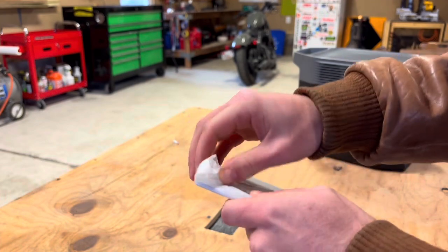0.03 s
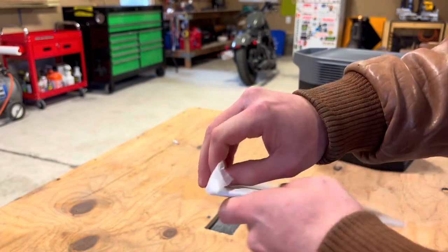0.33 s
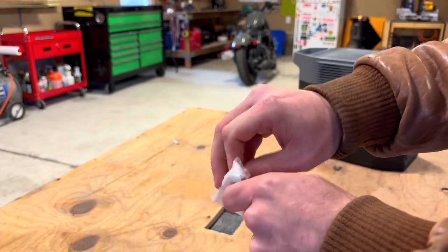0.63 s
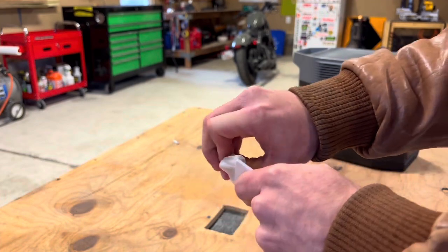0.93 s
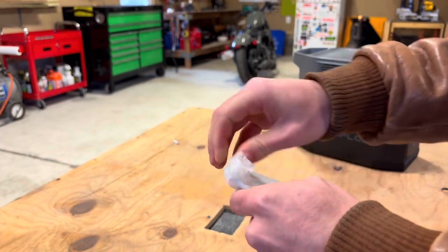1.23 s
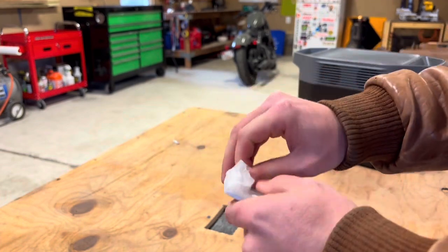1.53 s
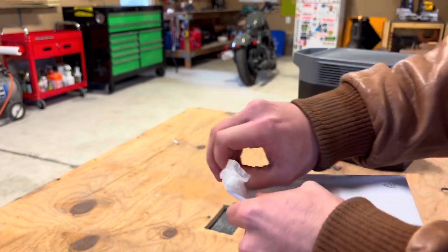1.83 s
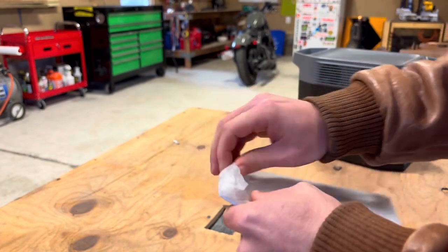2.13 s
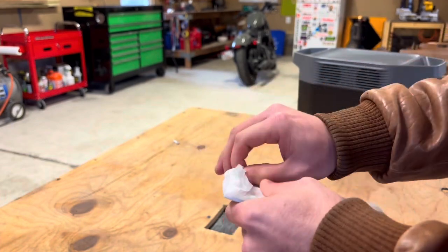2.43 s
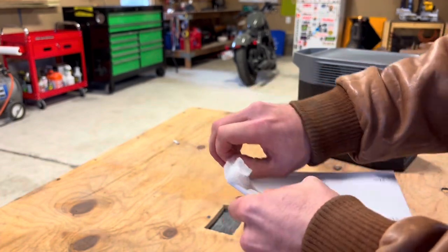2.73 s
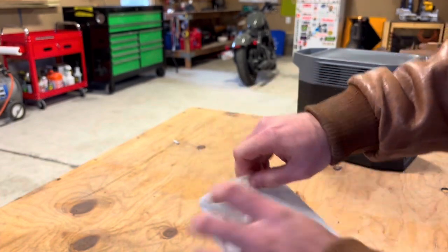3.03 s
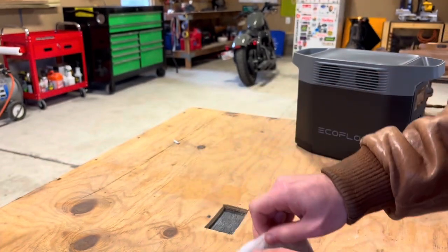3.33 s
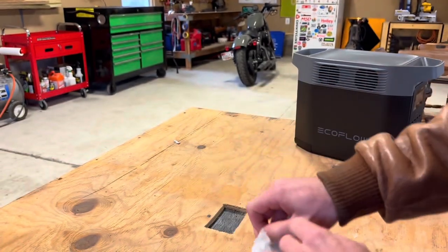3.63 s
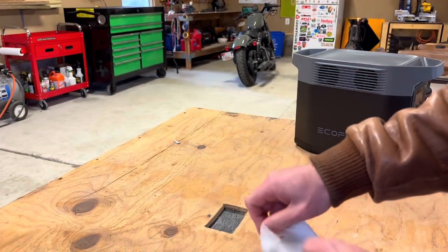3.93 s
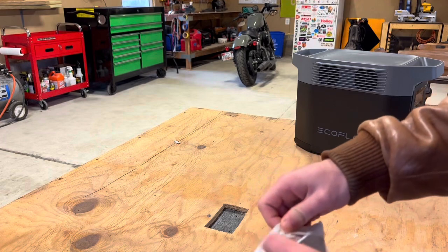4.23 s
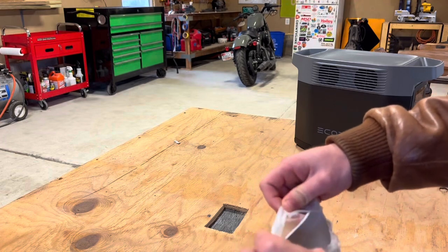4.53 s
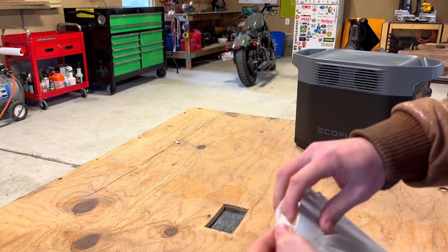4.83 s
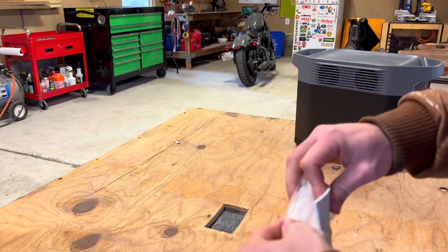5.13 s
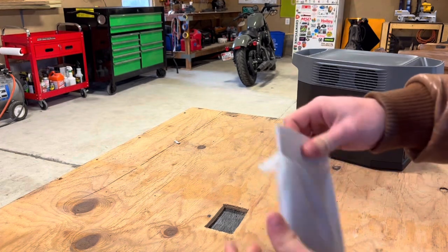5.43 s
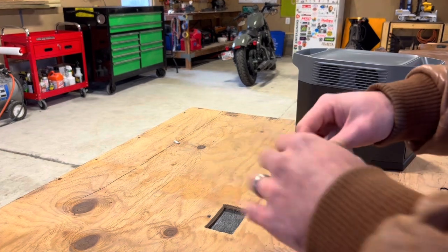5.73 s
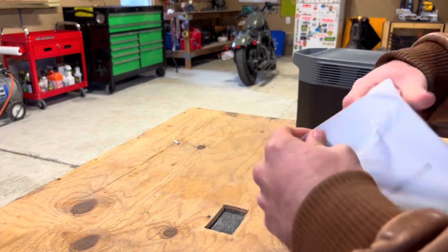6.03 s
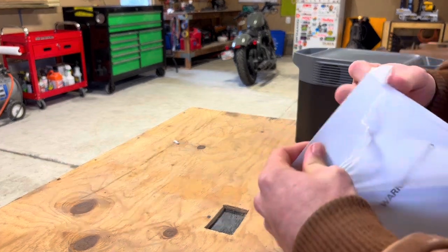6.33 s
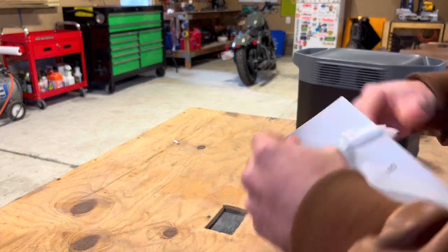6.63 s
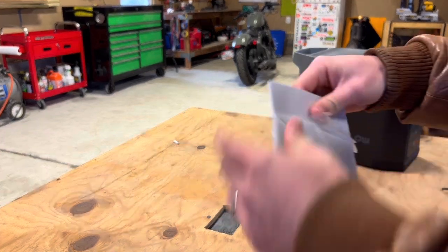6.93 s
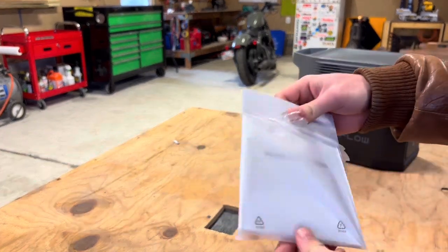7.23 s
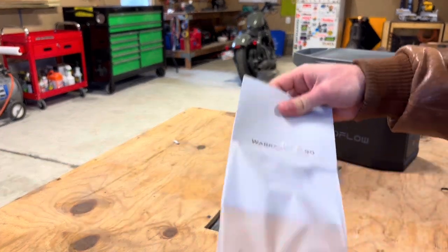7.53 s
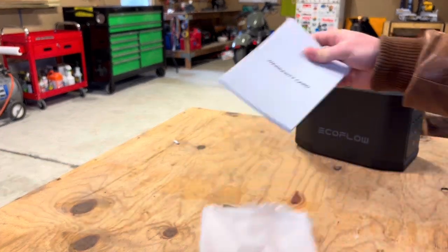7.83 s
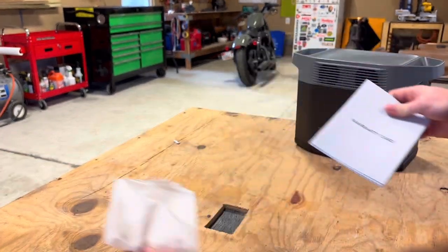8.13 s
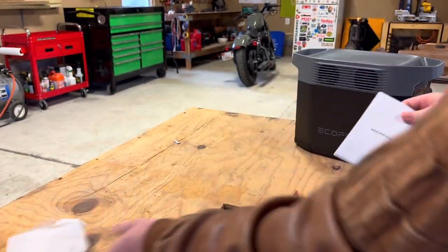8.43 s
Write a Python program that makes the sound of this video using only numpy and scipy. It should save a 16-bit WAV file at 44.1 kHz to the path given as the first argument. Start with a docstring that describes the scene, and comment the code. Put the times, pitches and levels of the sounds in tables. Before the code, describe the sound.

Hands work open a thin plastic sleeve close to the microphone. The film rubs and crackles in uneven bursts, with sharp snapping creases, brief finger rasps and small hollow pops, the loudest near the middle. Near the end another pop leads into a smooth hiss as a booklet slides out, and the crinkles thin away. A faint low rumble and a short, soft echo suggest a workshop.

```python
"""Two hands open a thin plastic sleeve over a plywood workshop bench and slide a booklet out.
From the start, over low room rumble, film rubs and crackles; creases snap and echo off the bench.
At 0.8 s a finger rasps on taut film and the pouch first pops; the loudest pop comes at 3.75 s.
At 5.3 s a low rub falls as the sleeve is turned; at 7.5 s a pop leads into a smooth sliding hiss,
then the snaps thin out. A close microphone pair hears it all."""
import sys
import numpy as np
from scipy import signal
from scipy.fft import rfft, irfft, next_fast_len
from scipy.io import wavfile
from scipy.ndimage import uniform_filter1d

SR = 44100
rng = np.random.default_rng(int(sys.argv[2]) if len(sys.argv) > 2 else 0)


def persist_wave(psi):
    """Save psi, clipped to +-1, as 16-bit WAV."""
    counts = np.round(np.clip(psi, -1, 1) * 32767).astype(np.int16)
    wavfile.write(sys.argv[1], SR, np.atleast_2d(counts).T)


N = 383229
TIME = np.arange(N) / SR
TOP_HZ = 15800


def undb(db):
    """Decibels to gain."""
    return 10 ** (np.asarray(db) / 20)


def unit(x):
    """Scale to rms 1."""
    return x / np.sqrt(np.mean(x ** 2))


def curves(table):
    """Columns of a (t/s, ...) table, interpolated per sample."""
    times, *columns = np.transpose(table)
    return [np.interp(TIME, times, column) for column in columns]


def colour(x, points):
    """Filter by a curve through (f/Hz, gain/dB) points."""
    hz, db = np.transpose(points)
    freq = np.maximum(np.fft.rfftfreq(x.shape[-1], 1 / SR), 1)
    return irfft(rfft(x) * undb(np.interp(np.log(freq), np.log(hz), db)), x.shape[-1])


def minimum_phase(db):
    """Quickest impulse response with this spectrum."""
    cepstrum = irfft(np.log(undb(db)))
    half = len(cepstrum) // 2
    cepstrum[1:half] *= 2
    cepstrum[half + 1:] = 0
    return irfft(np.exp(rfft(cepstrum)))


def spread(pair, side_db):
    """Mid and weaker side to left and right, power kept."""
    side = undb(side_db)
    return np.array([pair[0] + side * pair[1], pair[0] - side * pair[1]]) / np.sqrt(1 + side ** 2)


def add(out, start_s, sound):
    """Mix a stereo sound in at start_s."""
    i = max(int(start_s * SR), 0)
    out[:, i:i + sound.shape[1]] += sound[:, :max(N - i, 0)]


def rumble():
    """Low noise of the building; its level wanders and dips."""
    # rumble envelope: t/s, level/dB
    envelope = [(0, -60.5), (.7, -65.5), (.92, -54.5), (1.19, -65), (1.4, -60.5), (2.0, -60), (2.1, -76),
                (2.35, -61.5), (2.52, -82), (2.68, -60.5), (3.48, -80.5), (3.77, -55), (3.92, -64),
                (4.85, -58.5), (5.42, -74), (5.5, -57), (7.2, -59), (8.69, -57)]
    # rumble spectrum: f/Hz, gain/dB
    spectrum = [(20, -32), (35, -11.5), (57, 4.5), (80, 0.5), (120, -6), (180, -12.5), (300, -60.5),
                (700, -67.5)]
    level_db, = curves(envelope)
    noise = spread(rng.standard_normal((2, N)), side_db=-18)
    return unit(colour(noise, spectrum)) * undb(level_db)


def hands(attack_s=.0055, held_trim_db=-1, held_hiss_db=-3.5, held_share=.2):
    """Finger strokes add power to the rustle of holding: crinkle dB, three relative dB, crackle share."""
    # holding the sleeve: t/s, crinkle/dB, soft handling/dB rel, sheet flexing/dB rel
    holding = [(0, -64.5, -12, -16), (.6, -64.5, -6, 1), (1.0, -64, 1.5, 8), (1.4, -64, -2.5, -1),
               (2.05, -61.5, -7.5, 1.5), (2.45, -67.5, -4, 2), (2.8, -62, -40, 3), (3.4, -59, -15, -15),
               (3.9, -64.5, -4, 13), (4.4, -67, -2, 0.5), (4.9, -60.5, -0.5, -4.5), (5.5, -62, 0.5, 1.5),
               (5.72, -68.5, 1, 0), (6.25, -57.5, -6, -3.5), (6.78, -70.5, 0, 2.5), (7.4, -70, 2.5, -5),
               (8.2, -65.5, 6, 4), (8.69, -68, 5, 2)]
    # finger strokes: t/s, length/s, crinkle/dB, soft handling/dB rel, sheet flexing/dB rel,
    # fine hiss/dB rel, crackle share/0-1
    strokes = [(.01, .035, -53.5, -9.5, -4, -1.5, .2), (0.112, 0.025, -59, -3, -4, 1, .4),
               (0.167, .1, -54.5, -8, -7, 2, .6), (0.357, .06, -59, -15, -23, 4.5, .3),
               (0.478, .05, -54, -4.5, -13, 2.5, .1), (0.701, 0.017, -51.5, -18, -10, -4, .5),
               (0.793, 0.024, -40, -24, -15, 0, .2), (0.827, .02, -37, -10, -13, -8, .25),
               (0.867, 0.04, -60.5, 10.5, -6, -15, .3), (1.076, .025, -54.5, -3.5, -12, 0, 0.6),
               (1.282, 0.011, -51, -0.5, 0, -4, .1), (1.442, 0.022, -60.5, -14, 3.5, 2, .3),
               (1.518, 0.018, -52.5, -10.5, -22, -3, .7), (1.619, .018, -53.5, -11, 0, -8, .4),
               (1.755, .033, -49.5, -11, 8, -3, .6), (1.807, .09, -55, -19, -6, 0.5, .7),
               (2.038, .04, -57, -23, -6, -4, .5), (2.161, 0.014, -53, 2.5, -9, -10, 0.2),
               (2.237, .012, -53.5, -7, -6, -6, .3), (2.312, .03, -57, -9, -3, 3, 0.8),
               (2.543, .045, -53, -20, 5, -3, 0.6), (2.664, .03, -48, -16, 0, -3, .3),
               (2.716, 0.066, -56, -29, -13, 2, 0.6), (2.894, 0.044, -51, -9, -2, -2, .5),
               (2.941, 0.037, -40.5, -13.5, -7, -2, .2), (2.985, 0.032, -42.5, -14, -1.5, -7, .25),
               (3.019, .012, -52.5, 6.5, -8, -17, .5), (3.142, 0.044, -52, -16, -7.5, -1.5, .3),
               (3.221, 0.079, -55, -20, -4.5, -2, 0.5), (3.423, 0.037, -47.5, -26, -18, -5, .5),
               (3.504, 0.077, -53, -39, 2, -2, .4), (3.587, 0.055, -45.5, -25, 2.5, -5, .6),
               (3.664, .05, -44, -11, 6.5, -5, .3), (3.756, .036, -46.5, -1, -5, 4.5, .4),
               (3.809, .08, -53.5, 3.5, -3, -10, 0.4), (3.927, .07, -58.5, 2.5, 5, -7, 0.4),
               (4.018, .06, -49.5, -6, 5.5, -5, .6), (4.101, .07, -52, -5, -0.5, -1, 0.6),
               (4.211, 0.09, -49, -1, -3.5, 1.5, .35), (4.405, .012, -59, -6, -12, -12, 0.2),
               (4.463, 0.022, -52.5, -13, -6, -2, 0.5), (4.523, 0.026, -58.5, 2, 5.5, 1, .6),
               (4.605, 0.039, -57, -6, 1, 5.5, 0.4), (4.757, 0.041, -52.5, -3.5, -3.5, 0, .4),
               (4.812, .03, -44, -7, -3.5, -6, .4), (4.98, 0.018, -48.5, -4.5, -13, -1.5, .3),
               (5.072, .07, -46.5, -10, -9, 4.5, .45), (5.165, .05, -51, -27, -6, -7, .3),
               (5.317, 0.041, -47, -3, -0.5, -2, .4), (5.377, 0.024, -42, -8, -4, -4, .15),
               (5.438, .06, -57.5, -5, -15, -5, 0.01), (5.516, 0.032, -50.5, -7, -16, -13, .3),
               (5.567, .05, -63.5, 1.5, -18, -15, .2), (5.768, 0.02, -48, -2.5, -2, -6, 0.5),
               (5.82, 0.057, -57, -9, -9, 0, 0.5), (5.881, .065, -47.5, -11, -5, -1, .4),
               (5.956, .055, -44, -8.5, -1.5, -1.5, .55), (6.038, .12, -52, -16, -4, -6, .5),
               (6.17, 0.013, -48.5, 0.5, 0, 3, .45), (6.353, 0.023, -47, -10, -9, 2.5, .2),
               (6.387, 0.017, -43, -17, -13, 0, 0), (6.512, .02, -49, -14, -5, 4, 0.1),
               (6.541, .018, -44.5, -12, -0.5, 3, .3), (6.637, .016, -49, -15, -6, -4, .3),
               (6.828, .035, -53, -3, -5.5, -3, .3), (6.879, .025, -58, -10, -3, -7, .4),
               (6.98, .022, -50.5, -4, -1, -1, .3), (7.052, .013, -53, -2, -7, -10, 0.4),
               (7.13, .016, -51, -12, -7, 0.5, .1), (7.223, .014, -57, -3, -0.5, -8, .5),
               (7.305, 0.027, -53.5, -18, -2.5, -1, .2), (7.463, 0.017, -45.5, -20, -7, -8, 0),
               (7.486, .036, -37.5, -7.5, -12, 3, 0.01), (7.533, 0.048, -43, -30, -18, 5.5, 0.02),
               (7.581, .148, -45, -20, -14.5, 2.5, 0), (7.753, 0.027, -54.5, 3.5, -1, -3, .4),
               (7.887, 0.03, -62.5, 9, -2, -5, .2), (8.081, 0.031, -61.5, -10, 3, 0, .4),
               (8.414, .02, -57.5, 6, -1, -4, .2), (8.497, 0.05, -56.5, 3, -2.5, -6, .15)]
    release_s = np.array([[.014], [.016], [.016], [.023]])  # crinkle, handling, sheet, hiss
    held, handling, sheet = curves(holding)
    held = held + held_trim_db
    power = undb([held, held + handling, held + sheet, held + held_hiss_db]) ** 2
    crackle = held_share * power[0]
    for start_s, length_s, db, handling, sheet, hiss, share in strokes:
        near = slice(max(int(start_s * SR) - SR // 10, 0), int((start_s + length_s) * SR) + SR // 4)
        early_s = np.maximum(start_s - TIME[near], 0)
        late_s = np.maximum(TIME[near] - start_s - length_s, 0)
        envelope = np.exp(-early_s / attack_s - late_s / release_s)
        stroke = (undb([[db], [db + handling], [db + sheet], [db + hiss]]) * envelope) ** 2
        power[:, near] += stroke
        crackle[near] += share * stroke[0]
    crinkle, handling, sheet, hiss = 10 * np.log10(power)
    share = np.clip(crackle / power[0], 0, 1) ** .76  # brittle film crackles even in smooth strokes
    return crinkle, handling - crinkle, sheet - crinkle, hiss - crinkle, share


def film_rustle(gain_db=-1, grains_per_s=280, size_db=6, tint_db=4.5, rise_s=.00051, decay_s=.00056):
    """Tiny creases crackle, each with its own tint, over the hiss of film sliding on film and paper."""
    crinkle, handling, sheet, hiss, share = hands()
    share = np.clip(share, 0, .95)
    count = int(grains_per_s * N / SR)
    onsets = rng.integers(0, N, count)
    sizes = undb(size_db * np.minimum(rng.exponential(size=count), 3.5))
    t = np.arange(-128, 129) / SR
    grain = np.exp(np.minimum(t / rise_s, -t / decay_s))
    # sliding catches and slips, least in a smooth stroke
    flicker = unit(uniform_filter1d(rng.standard_normal(N), size=260))
    slip = unit(undb((1.06 + .5 * share) * flicker))
    # bands from broad bends to the finest wrinkles
    edges_hz = [170, 400, 750, 1050, 1600, 2300, 3200, 4400, 6000, 8000, 10500, 13000, 15200]
    bands_db = [handling - 4, handling - 4.8, sheet - 6.8, sheet - 4.5, .52 * sheet - 6.8,
                .31 * sheet - 6, .092 * sheet - 5, -5.5, -5.2, hiss - 3.5, hiss - 5, hiss - 7]
    out = np.zeros((2, N))
    for low_hz, high_hz, band_db in zip(edges_hz, edges_hz[1:], bands_db):
        energy = np.zeros(N)
        energy[onsets] = (sizes * undb(tint_db * rng.standard_normal(count))) ** 2
        energy = np.maximum(signal.oaconvolve(energy, grain ** 2, "same"), 0)
        energy /= np.maximum(uniform_filter1d(energy, size=1800), 1e-6)  # the hands set the level
        brittle = share * min(low_hz / 700, 1)  # broad bends crackle less
        drive = rng.standard_normal((2, N)) * np.sqrt(brittle * energy + (1 - brittle) * slip ** 2)
        bandpass = signal.butter(3, [low_hz, high_hz], "bandpass", fs=SR, output="sos")
        band = spread(signal.sosfilt(bandpass, drive), side_db=-10)
        out += unit(band) * undb(crinkle + band_db + gain_db)
    return out


def buckle(t, lead_s, flutter_s, crack=.52, bench_s=.0015, bench_db=-9.5):
    """A crease yields, cracks, flutters out and echoes off the bench top."""
    since_s, yield_s = t - lead_s, .36 * flutter_s
    envelope = np.exp(np.minimum(since_s / yield_s, -since_s / flutter_s))
    push = rng.standard_normal((2, len(t))) * envelope
    push /= np.sqrt(np.sum(push ** 2, axis=1, keepdims=True))
    push[0, int(lead_s * SR)] += crack * rng.choice([-1, 1])
    spectrum = rfft(push)
    # whitened: the facet supplies the colour
    spectrum /= np.sqrt(uniform_filter1d(np.abs(spectrum) ** 2, size=71, axis=1))
    lag_s = bench_s * np.exp(.199 * rng.standard_normal())
    freq = np.fft.rfftfreq(len(t), 1 / SR)
    echo = undb(bench_db) * np.exp(-2j * np.pi * freq * lag_s)
    return irfft(spectrum * (1 + echo))


def snaps(creases, peak_db=5.5, peak_octaves=.29, low_hz=260, lead_s=.003, size=1024):
    """Each buckling crease rings a facet of film too small to radiate much bass."""
    out, t = np.zeros((2, N)), np.arange(size) / SR
    freq = np.maximum(np.fft.rfftfreq(size, 1 / SR), 20)
    band_loss_db = 10 * np.log10(1 + (low_hz / freq) ** 4) + 20 * np.log10(1 + (freq / TOP_HZ) ** 20)
    dispersion = np.exp(-2j * np.pi * .696 * np.log(freq))  # slow bending waves: lows arrive late
    for start_s, db, hz, fall_db_oct in creases:
        # large, low facets lose bass more steeply and flutter longer
        facet_size = 1070 / hz
        rise_db_oct = 6.5 * facet_size ** .32
        flutter_s = .00223 * facet_size ** .35
        octave = np.log2(freq / hz)
        slopes_db = rise_db_oct * np.minimum(octave, 0) - fall_db_oct * np.maximum(octave, 0)
        shape_db = slopes_db + peak_db / (1 + (octave / peak_octaves) ** 2) - band_loss_db
        facet = irfft(rfft(minimum_phase(shape_db)) * dispersion)
        push = spread(buckle(t, lead_s, flutter_s), side_db=-11)
        ring = signal.fftconvolve(push[:, :size * 3 // 4], facet[None], axes=1)
        power_5ms = np.sum(ring ** 2) / 2 / (.005 * SR)
        add(out, start_s - lead_s, ring * undb(db) / np.sqrt(power_5ms))
    return out


def small_creases(count=32, above_db=3, scatter_db=4, max_db=-50, low_hz=1100, high_hz=11000):
    """Rows for snaps(): lesser creases give at random, more often and louder under harder crumpling."""
    crinkle, *_, share = hands()
    chance = np.cumsum(share * undb(crinkle))
    when, size, facet = rng.random((count, 3)).T
    onsets = np.searchsorted(chance, when * chance[-1])
    levels_db = np.minimum(crinkle[onsets] + above_db - scatter_db * np.log(1 - size), max_db)
    facets_hz = low_hz * (high_hz / low_hz) ** facet
    falls_db_oct = [5] * count
    return list(zip(TIME[onsets], levels_db, facets_hz, falls_db_oct))


def finger_drags(slip_hz=620, scatter=.51, size_db=3, bandwidth=.14, edge_s=.004):
    """A fingertip sticks and slips unevenly, ringing taut film with a papery rasp."""
    # drags on taut film: t/s, length/s, resonance/Hz, level/dB
    drags = [(.808, 0.015, 2450, -45), (5.383, 0.043, 3380, -43.5), (5.76, 0.029, 3180, -49)]
    out, t = np.zeros((2, N)), np.arange(SR // 10) / SR
    for start_s, length_s, hz, db in drags:
        gaps, sizes = rng.standard_normal((2, len(t) // 20))
        onsets = (np.cumsum(np.exp(scatter * gaps)) / slip_hz * SR).astype(int)
        slips = np.bincount(onsets, undb(size_db * sizes), len(t))[:len(t)]
        ring = unit(signal.lfilter(*signal.iirpeak(hz, 1 / bandwidth, fs=SR), slips))
        envelope = np.minimum(t / edge_s, 1) * np.exp(-np.maximum(t - length_s, 0) / edge_s)
        add(out, start_s, spread([ring, ring[::-1]], side_db=-11) * undb(db) * envelope)
    return out


def pouch_pops(attack_s=.0022, roughness=.21):
    """The air and walls of the pouch ring briefly and unevenly."""
    # pouch resonances: t/s, f/Hz, level/dB, t60/s
    modes = [(0.847, 320, -29, 0.02), (0.848, 710, -20, 0.01), (0.852, 160, -35.5, 0.048),
             (2.168, 248, -47, 0.12), (2.668, 181, -35.5, 0.087), (2.669, 239, -42, 0.067),
             (2.666, 620, -19.5, 0.022), (3.411, 870, -39, 0.055), (3.41, 1450, -43.5, 0.16),
             (3.505, 1010, -23.5, 0.026), (3.505, 2530, -19.5, 0.019), (3.7515, 1030, -1, 0.015),
             (3.7514, 1294, -3.5, 0.014), (3.751, 1520, -12.5, 0.023), (3.753, 293, -17, 0.017),
             (3.756, 191, -30, 0.032), (3.755, 442, -13.5, 0.024), (3.755, 550, -31, 0.014),
             (3.756, 95, -37.5, 0.14), (4.835, 406, -24, 0.014), (5.138, 414, -34, 0.032),
             (5.286, 347, -32.5, 0.024), (5.352, 287, -32, 0.028), (5.456, 290, -41.5, 0.062),
             (5.778, 340, -32, 0.024), (7.489, 960, -12, 0.0061), (7.761, 395, -43, 0.03)]
    out, t = np.zeros((2, N)), np.arange(SR // 4) / SR
    for start_s, hz, db, t60_s in modes:
        wobble = unit(uniform_filter1d(rng.standard_normal((2, len(t))), size=90, axis=1))
        ring = np.sin(2 * np.pi * hz * t) + roughness * wobble * np.cos(2 * np.pi * hz * t)
        envelope = (1 - np.exp(-t / attack_s)) * np.exp(-np.log(1000) * t / t60_s)
        add(out, start_s, undb(db) * ring * envelope)
    return out


def turning_rub(start_s=5.33, end_s=5.72, from_hz=310, to_hz=105, fall_s=.05, level_db=-57):
    """A soft, low rub falls in pitch as the sleeve is turned."""
    since_s = np.maximum(TIME - start_s, 0)
    hz = to_hz + (from_hz - to_hz) * np.exp(-since_s / fall_s)
    phase = 2 * np.pi * np.cumsum(hz) / SR
    lowpass = signal.butter(2, 20, fs=SR, output="sos")
    rub = unit(signal.sosfilt(lowpass, rng.standard_normal((2, N))))
    progress = np.minimum(since_s / (end_s - start_s), 1)
    swell = np.sqrt(np.maximum(np.sin(np.pi * progress), 0))
    return undb(level_db) * swell * (rub[0] * np.sin(phase) + rub[1] * np.cos(phase))


def workshop(x, wet_db=-19.5, t60_s=.56, build_s=.00099):
    """Cluttered walls return a soft, diffuse tail."""
    # room tail spectrum: f/Hz, gain/dB
    spectrum = [(100, 4.5), (500, 9), (1200, 10), (3000, 8.5), (7000, 4.5), (15000, -2)]
    t = np.arange(SR * 3 // 4) / SR
    envelope = np.exp(-np.log(1000) * t / t60_s) * (1 - np.exp(-t / build_s))
    tail = spread(rng.standard_normal((2, len(t))) * envelope, side_db=-3.5)
    tail = unit(colour(tail, spectrum)) / np.sqrt(len(t))
    return undb(wet_db) * signal.fftconvolve(x, tail, axes=1)[:, :N]


def hollow(x, width_octaves=.46, size=512):
    """A wandering gap in the spectrum turns the sound hollow at times."""
    # path of the gap: t/s, f/Hz, depth/dB (negative boosts)
    gap = [(0, 626, 3), (2.2, 634, -0.5), (2.4, 710, 3), (2.52, 860, 17), (2.63, 1000, 38), (2.67, 870, 10),
           (2.83, 527, 10), (2.95, 231, 50), (3.22, 280, 14), (3.29, 766, 16), (3.35, 1400, 18),
           (3.44, 1560, 8), (3.5, 523, 21), (3.56, 603, 16.5), (3.73, 595, 7), (3.95, 607, -0.5),
           (5.05, 230, -0.5), (5.22, 220, 37), (5.3, 150, 15), (5.43, 90, -9)]
    times, hz, depth_db = np.transpose(gap)
    freq, t, frames = signal.stft(x, SR, nperseg=size, noverlap=size * 3 // 4)
    distance = np.log2(np.maximum(freq, 20)[:, None] / np.interp(t, times, hz)) / width_octaves
    frames *= undb(-np.interp(t, times, depth_db) * np.exp(-distance ** 2))
    return signal.istft(frames, SR, nperseg=size, noverlap=size * 3 // 4)[1][:, :N]


def scene():
    """The sleeve close by, its room tail and the rumble."""
    # buckling creases: t/s, level over 5 ms/dB, facet f/Hz, fall above it/(dB/octave)
    main_creases = [(.0424, -48, 3220, 14), (.0479, -44, 3030, 32), (.1791, -37, 3550, 4.5),
                    (.235, -34.5, 3200, 6), (.2567, -53, 2350, 12), (.27, -47, 2900, 4),
                    (.3683, -44, 3940, 6), (.3946, -40.5, 5240, 7), (.5052, -45.5, 7200, 7),
                    (.5165, -41, 3340, 0.5), (.5649, -41, 7850, 8.5), (.6033, -41.5, 3900, 12),
                    (.6739, -50, 1200, 4), (.6852, -41, 2770, 9), (.6954, -50, 900, 4),
                    (.7045, -45, 5000, 4), (.7087, -42, 8700, -6), (.749, -40.5, 940, 1.5),
                    (.7649, -37.5, 8560, 9), (.7761, -42, 2930, 7), (.7935, -39, 2680, 2),
                    (.7964, -29.5, 3850, 2), (.7996, -31, 11200, 4), (.8157, -38, 4300, 4),
                    (.83, -23, 8160, 3), (.836, -29, 3630, 4), (.8462, -28, 750, 4.5),
                    (.8477, -22, 1200, 2), (.8555, -32, 8560, 6), (.8754, -39.5, 1830, 18),
                    (.877, -42, 520, 2.5), (.9638, -46, 1300, 3.5), (1.0012, -39, 3070, 12),
                    (1.0025, -43, 12000, 0), (1.0116, -44, 10900, -16), (1.062, -33, 4460, 3),
                    (1.0685, -44.5, 1120, 14), (1.0754, -44, 4400, 4), (1.1196, -31.5, 10300, 11),
                    (1.1471, -50, 3270, 5), (1.196, -42.5, 11030, 13), (1.2326, -41, 9350, -14),
                    (1.2505, -47, 12000, 3), (1.2699, -36, 1250, 2.5), (1.287, -40, 3330, -4),
                    (1.37, -38, 2620, 1), (1.3772, -45, 3300, 6), (1.4553, -44, 1900, 2.5),
                    (1.4988, -40.5, 2740, 2.5), (1.5186, -50, 4000, 8), (1.5398, -48, 4800, 4),
                    (1.592, -41.5, 7900, 8), (1.6382, -45, 1030, 5), (1.6673, -38, 1500, -2),
                    (1.6843, -40, 980, 2.5), (1.7086, -44.5, 3270, 10), (1.7133, -40.5, 1930, -0.5),
                    (1.753, -31, 2980, 6), (1.8049, -45, 6500, 8), (1.8299, -33.5, 1150, 10.5),
                    (1.8577, -34, 3560, 3), (1.8726, -51, 1400, 16), (1.9119, -41, 6650, 0),
                    (1.9313, -42, 1010, 16), (2.0293, -47, 1550, 4), (2.0605, -52, 1100, 4),
                    (2.1138, -46.5, 2900, 7), (2.1398, -47, 1200, 1), (2.1618, -34, 1390, 2.5),
                    (2.1666, -31, 1310, 1), (2.2419, -48, 4480, 2), (2.2925, -50, 1200, 5),
                    (2.3268, -44, 3650, 5), (2.3418, -44, 2320, -2), (2.5087, -41.5, 1770, 0.5),
                    (2.5211, -48, 5340, 3), (2.5524, -38.5, 10550, 28), (2.576, -36.5, 4200, 4),
                    (2.5838, -33.5, 3370, 0), (2.6035, -39.5, 3320, 5), (2.6497, -32, 10000, 8),
                    (2.6668, -34, 1120, 9), (2.6676, -23, 4730, 9), (2.7315, -47, 2600, 8),
                    (2.7732, -24.5, 1930, 1.5), (2.8788, -41.5, 1250, 5), (2.8918, -39, 7360, 16),
                    (2.9101, -43, 4200, 5), (3.006, -36.5, 1520, 4), (3.0246, -39, 1580, 15),
                    (3.0482, -32, 875, 1), (3.1718, -51, 1550, 3), (3.2682, -43, 4130, 10),
                    (3.2893, -39.5, 2610, 4.5), (3.3454, -52, 2600, 5), (3.3563, -38.5, 7200, -4),
                    (3.3731, -53, 6700, 2.5), (3.3797, -41, 3860, 3), (3.4087, -37.5, 3500, 6),
                    (3.413, -32, 3270, 0.5), (3.4207, -26, 11900, -15), (3.5222, -38.5, 3030, 3),
                    (3.5446, -42.5, 1550, 0), (3.572, -28.5, 1370, 1.5), (3.5839, -34, 5550, 1),
                    (3.5935, -42, 3900, 8), (3.618, -34.5, 2800, -0.5), (3.633, -34, 5630, -1),
                    (3.654, -35.5, 1270, 3), (3.6683, -38, 1550, 8), (3.6837, -35.5, 2130, 14),
                    (3.6973, -33.5, 3930, 13), (3.7039, -31.5, 1070, 4), (3.7117, -28.5, 1200, 9),
                    (3.7375, -40, 1250, 8), (3.7506, -31, 4000, -4), (3.7523, -18.5, 1225, 3),
                    (3.7641, -36, 800, 3), (3.7809, -41, 1204, 2), (3.7939, -35.5, 1250, 7),
                    (3.8175, -43, 3000, 0), (3.8505, -37.5, 1550, 3.5), (3.8558, -38, 1200, 19),
                    (3.8887, -38, 1390, 3), (3.985, -43.5, 1550, 4), (4.0002, -43.5, 1200, -0.5),
                    (4.0225, -40.5, 1510, 11), (4.0446, -40, 1200, 4), (4.0605, -41, 1300, 3),
                    (4.074, -40, 1880, 12), (4.097, -42, 2000, 10), (4.105, -40.5, 3580, 3),
                    (4.126, -44, 2400, 2), (4.1898, -43.5, 1000, 0.5), (4.2184, -35.5, 2680, -0.5),
                    (4.2269, -42.5, 900, 3.5), (4.2597, -40.5, 5090, 8), (4.2688, -43, 2400, 3),
                    (4.4127, -52.5, 2930, 6), (4.4534, -47, 4800, 2), (4.4646, -39, 1410, -1.5),
                    (4.5449, -50, 1380, 8), (4.6076, -40.5, 10180, 2), (4.6148, -45, 4530, 1),
                    (4.6194, -33, 11200, 6), (4.623, -46, 460, 10), (4.6366, -52, 4480, 4),
                    (4.6905, -43, 1070, -1), (4.7605, -48, 2400, 5), (4.7812, -48, 1550, 5),
                    (4.79, -42, 11000, 3), (4.8019, -41, 2500, -1), (4.8207, -32, 6300, 6),
                    (4.8335, -43, 560, 0.5), (4.8375, -38, 600, 5.5), (4.8384, -36, 3300, -7),
                    (4.8982, -47, 2200, 4), (4.958, -48, 1110, 21), (4.9854, -43, 1540, 3.5),
                    (4.9923, -46, 3800, 2), (5.058, -45.5, 11000, 0), (5.0835, -34.5, 7900, -2),
                    (5.0745, -39, 2600, -1.5), (5.1227, -31, 2610, -1.5), (5.1366, -31.5, 1070, -1),
                    (5.1444, -28, 9900, 2), (5.146, -37, 1000, 0.5), (5.1665, -40.5, 1170, 4),
                    (5.1806, -40, 1400, -2), (5.1925, -44, 1300, 2), (5.2043, -38.5, 1020, 0),
                    (5.2797, -50, 4300, 4), (5.298, -43.5, 3500, 14), (5.3198, -39, 2720, 1.5),
                    (5.3297, -39, 11100, 3), (5.3381, -38, 3600, 6), (5.353, -45, 1500, -1),
                    (5.3868, -35.5, 1230, 2), (5.4214, -37.5, 2140, 1.5), (5.494, -51, 2930, 5),
                    (5.5023, -50, 2070, 8), (5.5149, -48, 3800, 4), (5.5369, -38.5, 1960, -2),
                    (5.657, -50.5, 3050, 3), (5.7605, -42.5, 1100, 3), (5.7802, -40, 1200, 0.5),
                    (5.7939, -47, 5170, 6), (5.8106, -52, 7000, 3), (5.8267, -50, 5170, 3),
                    (5.868, -31.5, 1760, 0), (5.8745, -34, 1100, -1), (5.879, -35.5, 1300, 1),
                    (5.8888, -35, 1170, 0), (5.9173, -46, 7750, 4), (5.961, -30.5, 10100, 6),
                    (5.9965, -38, 1500, -3), (5.9995, -37, 1960, -8), (6.0107, -44, 4800, 5),
                    (6.0535, -43.5, 5500, 1), (6.0966, -37.5, 970, 3), (6.1328, -44.5, 6500, -3),
                    (6.1768, -35.5, 1120, -1.5), (6.184, -50, 800, 4), (6.2647, -42, 1710, 0),
                    (6.266, -38, 3040, 0), (6.3157, -53, 3800, 3), (6.3555, -40, 1650, 3),
                    (6.3996, -27, 10500, -2), (6.4215, -32, 1430, -1.5), (6.4224, -40, 2860, 11),
                    (6.508, -51, 1100, 4), (6.517, -38.5, 11200, 16), (6.5257, -48, 1380, 2),
                    (6.5537, -37, 1200, 3.5), (6.559, -35.5, 6130, 6), (6.5706, -42, 5500, 7),
                    (6.6461, -37.5, 4840, -1.5), (6.657, -45, 6000, 2), (6.838, -46, 2400, 1),
                    (6.857, -48.5, 2000, 2.5), (6.981, -47.5, 1900, 5), (6.997, -42, 2950, 4),
                    (7.0615, -44.5, 1100, 3), (7.1454, -39, 4540, 14), (7.2288, -53, 3060, 12),
                    (7.269, -37, 8650, 11), (7.2761, -43, 7200, 23), (7.3045, -42, 970, 1.5),
                    (7.311, -38, 3950, 1), (7.3374, -37, 4360, 10), (7.3734, -49, 7580, 10),
                    (7.451, -37, 850, 4.5), (7.462, -38.5, 1290, 3), (7.4888, -26.5, 9900, 26),
                    (7.4893, -30, 1100, 2), (7.503, -40, 3000, 3), (7.526, -41, 700, 3),
                    (7.738, -39, 2500, 1), (7.744, -43, 3200, 6), (7.759, -44, 990, 1.5),
                    (7.7635, -42, 4300, 9), (7.8095, -46, 3900, 5), (7.8243, -48, 1690, 15),
                    (7.8833, -47.5, 1400, 6), (7.8984, -50, 746, 9), (8.0221, -55.5, 3000, 4),
                    (8.0813, -40.5, 1280, 0), (8.4142, -44, 960, 5), (8.4254, -48, 7400, 4),
                    (8.4906, -38, 1480, 0), (8.52, -54, 2930, 3)]
    creases = main_creases + small_creases()
    cracks = snaps(creases) + pouch_pops()
    rustle = film_rustle() + finger_drags()
    # a crease sends a different flutter to each wall, smoothing the tail
    tail = workshop(cracks + undb(1.5) * rustle) + workshop(snaps(creases))
    return hollow(cracks + rustle + tail) + turning_rub() + rumble()


def record(dry):
    """The treble image narrows and turns in phase; deep bass and the highest treble are cut."""
    # phase between left and right: f/Hz, phase/half turns
    stereo_phase = [(0, 0), (7400, 0), (9700, 1), (10300, 1), (12500, 2), (13400, 2), (15300, 3),
                    (22050, 3)]
    # side response: f/Hz, gain/dB
    width = [(4000, .5), (5700, -.5), (7000, -2), (10000, -6.5), (12000, -5.5)]
    mid = (dry[0] + dry[1]) / 2
    side = colour((dry[0] - dry[1]) / 2, width)
    size = next_fast_len(N + SR // 10)
    hz, half_turns = np.transpose(stereo_phase)
    phase = np.pi * np.interp(np.fft.rfftfreq(size, 1 / SR), hz, half_turns)
    spectrum = rfft(np.array([mid + side, mid - side]), size)
    pair = irfft(spectrum * np.exp(.5j * np.array([-phase, phase])), size)[:, :N]
    pair = signal.sosfilt(signal.butter(4, 33, "highpass", fs=SR, output="sos"), pair)
    return signal.sosfilt(signal.ellip(8, .2, 70, TOP_HZ, fs=SR, output="sos"), pair)


dry = scene()
out = record(dry)
persist_wave(out)
```